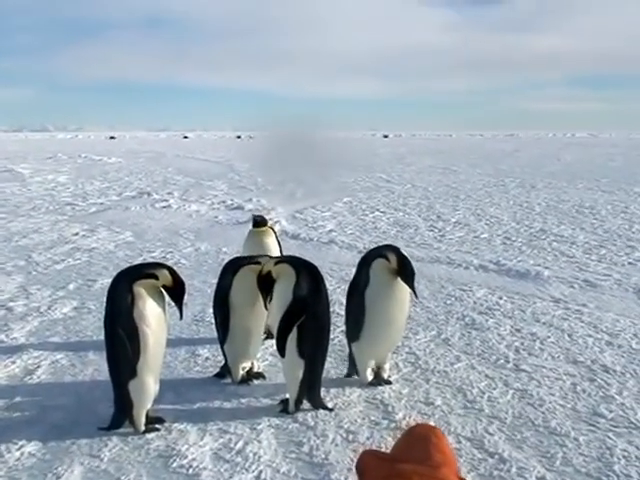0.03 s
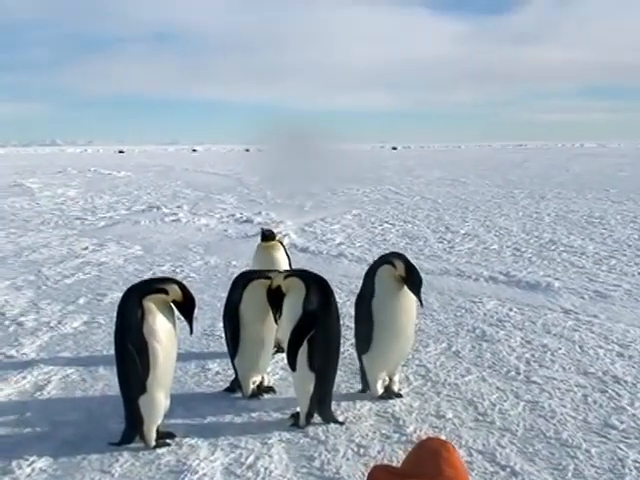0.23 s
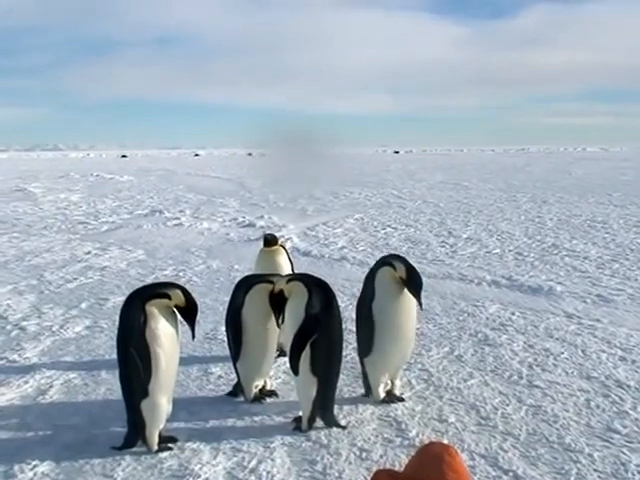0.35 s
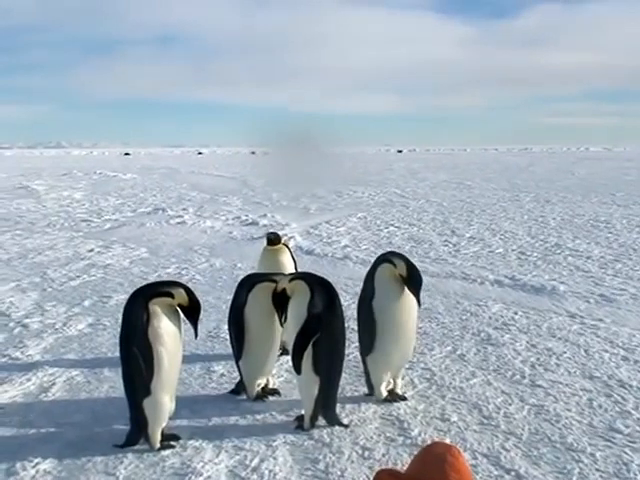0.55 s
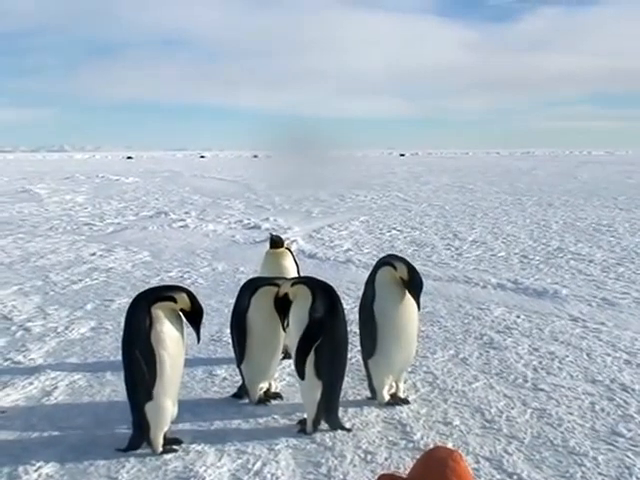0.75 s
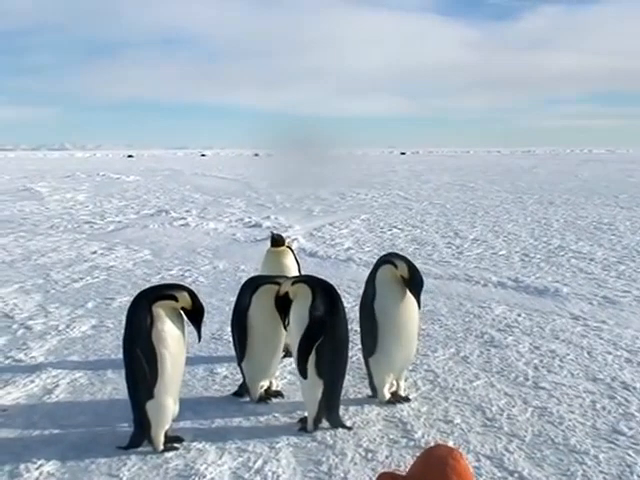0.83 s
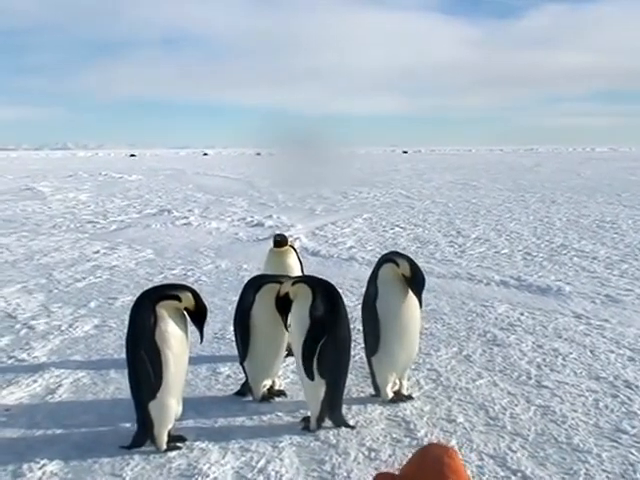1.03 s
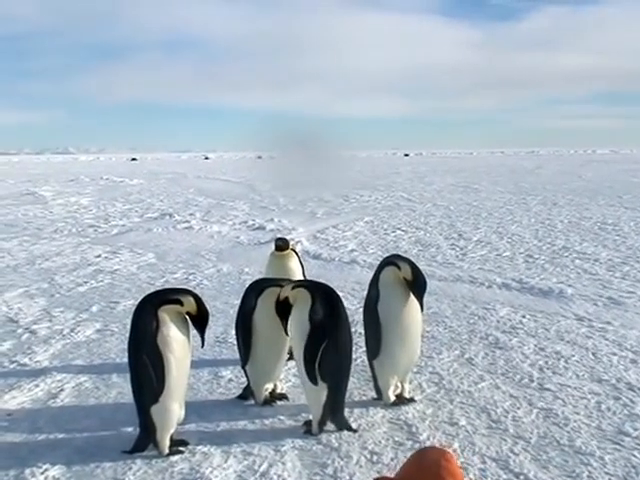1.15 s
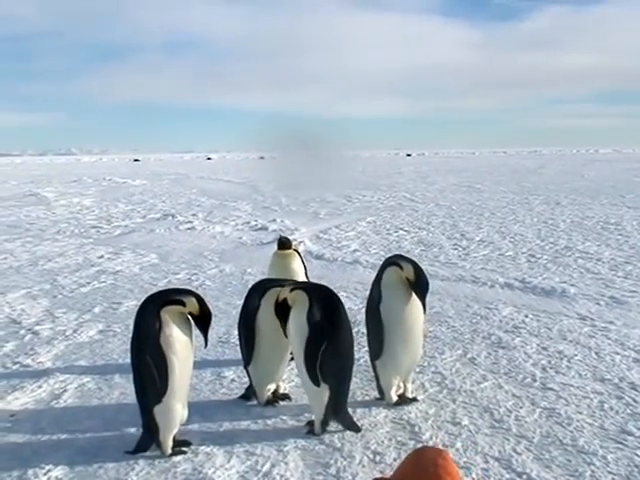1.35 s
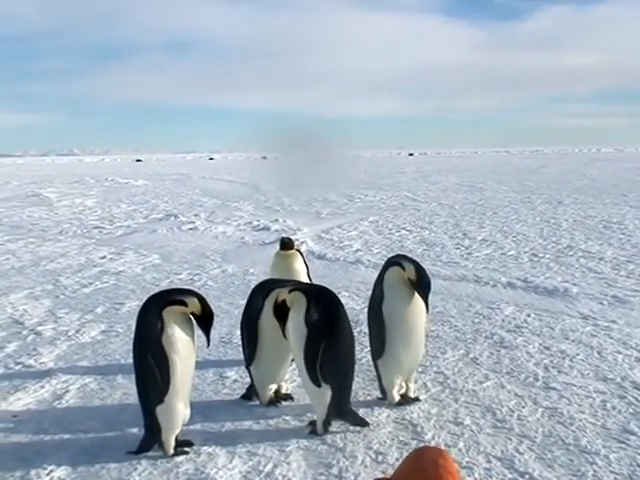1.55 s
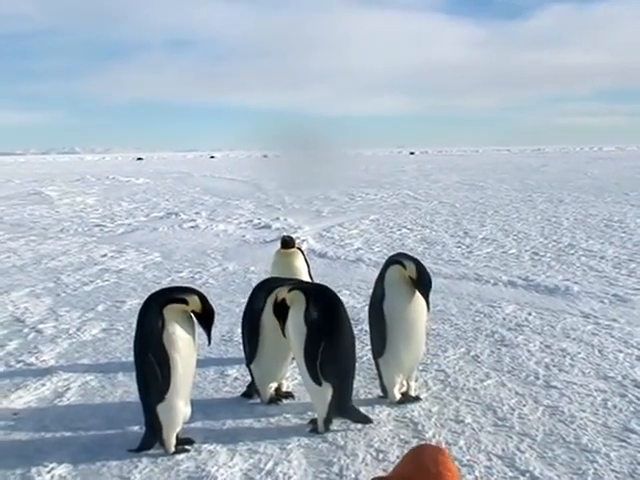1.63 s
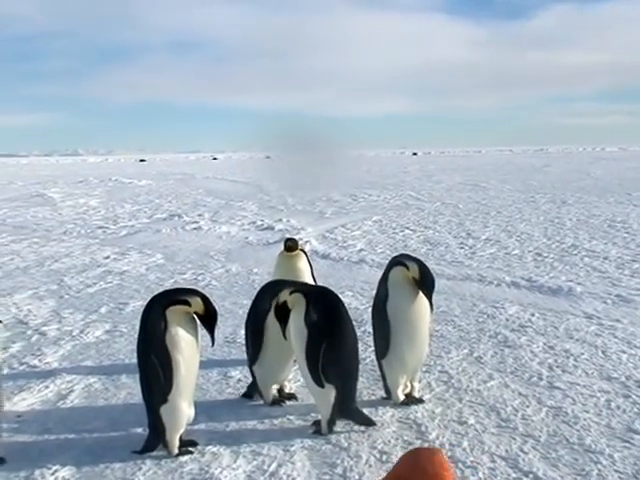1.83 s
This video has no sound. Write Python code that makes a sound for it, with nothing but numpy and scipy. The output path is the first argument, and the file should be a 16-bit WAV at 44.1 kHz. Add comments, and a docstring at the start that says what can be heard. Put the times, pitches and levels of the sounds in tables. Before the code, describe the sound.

A penguin's call dominates: dry uneven throat creaks at 0.12-0.23 s, then seven harsh, buzzing two-pitched syllables. Two short raspy bursts come by 0.4 s, three steadier ones until 1.0, a longer clearer one at 1.04-1.4, and a last at 1.44-1.63 that fades. Snow crunches and snaps at the start, softer steps follow, tiny snaps near 1.78. Faint open air and low hum throughout.

```python
"""Emperor penguin call on sea ice

A creak, then seven warbling syllables. Two syrinx sides pulse at different pitches and pull on each
other; the voice beats about 45-115 times a second as it rings the throat, and the ice scatters a tail.
Feet crunch and thud on snow (shaped grains and noise), crust snaps (single clicks) and a faint wash
of air with a low hum (filtered noise) runs throughout.
"""
import sys
import numpy as np
from scipy import signal
from scipy.fft import rfft, irfft
from scipy.io import wavfile
from scipy.ndimage import uniform_filter1d

SR = 44100
rng = np.random.default_rng(int(sys.argv[2]) if len(sys.argv) > 2 else 0)


def materialize(psi):
    """Save the field psi as 16-bit PCM at rate SR to the path in sys.argv[1].

    A 1-D psi becomes a single channel; in a 2-D psi each row is a channel.
    """
    bounded = np.clip(np.atleast_2d(psi).T, -1, 1)
    quanta = np.round(bounded * 32767).astype(np.int16)
    wavfile.write(sys.argv[1], SR, quanta)


N = 83790


def undb(db):
    """Decibels to gain."""
    return 10 ** (np.asarray(db) / 20)


def unit(x):
    """Scale to rms 1."""
    return x / np.sqrt(np.mean(x ** 2) + 1e-18)


def response(points, hz):
    """Interpolate (f/Hz, level/dB) points on a log-frequency axis."""
    f, db = np.array(points, float).T
    return np.interp(np.log(hz + 1), np.log(np.sort(f)), db)


# Throat spectrum added at harshness 1: f/Hz, level/dB
HARSH_SPECTRUM = [(300, 2.5), (450, 0), (660, 7.5), (820, -3.5), (1030, 2.5), (1250, 1), (1850, 8),
                  (2080, 15.5), (2400, 3.5), (2900, 6), (4000, -1.5), (5600, 7.5), (7500, 1.5),
                  (12000, 4.5)]


def ring(points, tuning=1, harshness=0, size=4096):
    """Minimum-phase impulse response of a body with this spectrum, by folding the cepstrum."""
    hz = np.arange(size // 2 + 1) * SR / size
    db = response(points, hz / tuning) + harshness * response(HARSH_SPECTRUM, hz)
    cepstrum = irfft(np.log(undb(db)))
    cepstrum[1:size // 2] *= 2
    cepstrum[size // 2 + 1:] = 0
    return irfft(np.exp(rfft(cepstrum)))[:size // 2]


def through(x, impulse):
    """Let x excite an impulse response."""
    return signal.fftconvolve(x, impulse)[:N]


def clicks(times_s, sizes, order=8):
    """Band-limited impulses at sub-sample times (windowed sinc)."""
    out = np.zeros(N)
    at = np.asarray(times_s)[:, None] * SR
    taps = np.floor(at).astype(int) + np.arange(1 - order, order + 1)
    kernel = np.sinc(taps - at) * np.sinc((taps - at) / order)
    np.add.at(out, np.clip(taps, 0, N - 1), np.asarray(sizes)[:, None] * kernel)
    return out


def noise(points):
    """Coloured noise of rms 1."""
    return unit(through(rng.standard_normal(N), ring(points)))


GRAINS_PER_S, GRAIN_SPREAD_DB = 2200, 1


def grains(points):
    """Dense small clicks of uneven size and random sign through a body, rms 1."""
    size_db = GRAIN_SPREAD_DB * np.minimum(rng.exponential(size=N), np.pi)
    size = undb(size_db) * rng.choice([-1, 1], N)
    present = rng.random(N) < GRAINS_PER_S / SR
    return unit(through(size * present, ring(points)))


def knocks(table, points):
    """Single clicks (t/s, level/dB) into one body of peak 1."""
    times_s, db = np.array(table).T
    body = ring(points)
    return through(clicks(times_s, undb(db)), body / abs(body).max())


# Air spectrum: f/Hz, level/dB
AIR_SPECTRUM = [(15, -6), (25, -22), (148, -7), (204, -2.5), (340, -10), (495, -6.5), (684, -14),
                (1200, -11), (3630, -16.5), (4870, -13.5), (9300, -23.5), (12200, -21.5), (15500, -43)]
AIR_DB, AIR_SIDE_DB = -45.5, -5  # side: relative to mid
HUM_HZ, HUM_WIDTH_HZ, HUM_DB = 99.7, 29, -57


def air(t):
    """Wide coloured noise plus a wavering hum of narrow-band noise."""
    hz = np.arange(N // 2 + 1) * SR / N
    resonance = 1 / (1 + ((hz - HUM_HZ) / HUM_WIDTH_HZ * 2) ** 2)
    hum = unit(irfft(rfft(rng.standard_normal(N)) * resonance, N))
    mid = noise(AIR_SPECTRUM)
    side = undb(AIR_SIDE_DB) * noise(AIR_SPECTRUM) * np.array([[1], [-1]])
    return undb(AIR_DB) * (mid + side) + undb(HUM_DB) * hum


# Foot presses: t/s, Gaussian half-width/s, crunch level/dB, thud level/dB
FOOT_STEPS = [(.005, 0.024, -33, -40), (0.032, 0.0042, -29, -31), (0.059, 0.021, -33.5, -45),
              (0.161, 0.051, -46.5, -31), (0.321, 0.037, -38.5, -38.5), (0.435, 0.055, -30, -36),
              (0.661, 0.037, -32, -42.5), (0.843, 0.024, -30, -43.5), (1.456, 0.038, -29.5, -45),
              (1.678, .025, -51, -53), (1.782, .011, -41.5, -46)]
# Crunch spectrum: f/Hz, level/dB
CRUNCH_SPECTRUM = [(100, -5), (400, 9.5), (750, 10.5), (1500, 1), (3300, -10), (5000, -21.5), (9000, -26.5),
                   (12000, -29.5), (15000, -22)]
# Thud spectrum: f/Hz, level/dB
THUD_SPECTRUM = [(45, -23), (110, 4), (200, 9), (330, 4), (600, 0), (1200, -6), (4000, -50)]
# Crust snaps: t/s, peak level/dB
CRUST_SNAPS = [(.005, -24), (.0097, -21.5), (.030, -34), (.0386, -23.5), (.0555, -24), (.0786, -26),
               (.0924, -25.5), (1.775, -32), (1.779, -28), (1.784, -33), (1.788, -31), (1.864, -36)]
# Snap spectrum: f/Hz, level/dB
SNAP_SPECTRUM = [(200, -10), (800, -30), (2000, 12), (3600, 4), (5000, -16), (9000, -12), (15000, -36)]


def snow(t):
    """Packing snow breaks grain by grain over a dull thud; bits of crust snap as single clicks."""
    crunch, thud = grains(CRUNCH_SPECTRUM), noise(THUD_SPECTRUM)
    steps = np.zeros(N)
    for at_s, length_s, crunch_db, thud_db in FOOT_STEPS:
        press = np.exp(-((t - at_s) / length_s) ** 2)
        steps += press * (undb(crunch_db) * crunch + undb(thud_db) * thud)
    return steps + knocks(CRUST_SNAPS, SNAP_SPECTRUM)


# Throat creak pulses before the voice catches: t/s, relative level/dB
CREAK_PULSES = [(.120, -9), (.123, -8), (.1295, -0.5), (.1365, -20), (.141, -1.5), (.1477, -7),
                (.1587, -14), (.167, -7), (.174, -14), (.186, -23), (.1873, -0.5), (.1915, -21),
                (.198, -10), (.2008, -6), (.210, -2), (.2245, 2.5), (.229, 1)]
# Creak spectrum: f/Hz, level/dB
CREAK_SPECTRUM = [(100, -14), (550, -7), (750, -1), (1080, -1), (1300, -9), (1550, -2), (1950, 0),
                  (2450, -8), (5000, -15), (7000, -28), (15000, -40)]
CREAK_DB, CREAK_GRIT_DB = -8.5, -34.5


def creak(t):
    """Slow, uneven throat pulses with fine grit between them lead into the call."""
    first_s, last_s = CREAK_PULSES[0][0], CREAK_PULSES[-1][0]
    span = uniform_filter1d(1. * ((t > first_s) & (t < last_s)), size=200)
    grit = undb(CREAK_GRIT_DB) * span * grains(CREAK_SPECTRUM)
    return grit - undb(CREAK_DB) * knocks(CREAK_PULSES, CREAK_SPECTRUM)


SQUEEZE, BEAT_LAG_CYCLES = .15, .02
JITTER_S, SHIMMER_DB = .00006, 2  # at roughness 1
RASP_DB, RASP_CYCLES = -13, .3


def membrane(t, phase, beat, rough):
    """One syrinx side: a pulse and a decaying puff each cycle; pulses swell with the beat."""
    times_s = np.interp(np.arange(1, phase[-1]), phase, t)
    late, size = rng.standard_normal((N // 20, 2))[:len(times_s)].T
    strength = 1 + SQUEEZE * np.cos(2 * np.pi * (beat + BEAT_LAG_CYCLES))
    pulse_rough = np.interp(times_s, t, rough)
    pulse_size = np.interp(times_s, t, strength) * undb(SHIMMER_DB * pulse_rough * size)
    pulses = clicks(times_s + JITTER_S * pulse_rough * late, pulse_size)
    puffs = unit(np.exp(-(phase % 1) / RASP_CYCLES) * rng.standard_normal(N))
    return unit(pulses) + undb(RASP_DB) * np.sqrt(rough) * puffs


TREBLE_HZ, TREBLE_DIP, DIP_LAG_CYCLES = 1315, 0.12, 0.019
WINDPIPE_S, WINDPIPE_ECHO = (.0009, .00155), 0.5


def windpipe(x, beat):
    """All-pass echoes thicken the treble, which softens as both sides close together; bass is direct."""
    hz = np.arange(N // 2 + 1) * SR / N
    treble = rfft(x) / (1 + (TREBLE_HZ / (hz + 1)) ** 20)
    bass = x - irfft(treble, N)
    for trip_s in WINDPIPE_S:
        delay = np.exp(-2j * np.pi * hz * trip_s)
        treble = treble * (WINDPIPE_ECHO + delay) / (1 + WINDPIPE_ECHO * delay)
    dip = 1 - TREBLE_DIP * np.cos(2 * np.pi * (beat + DIP_LAG_CYCLES))
    return bass + irfft(treble, N) * dip


# Syrinx pitch track: t/s, low side f/Hz, high side f/Hz
SYRINX_PITCH = [(.22, 250, 300), (.255, 335.9, 405.8), (0.284, 290.2, 337.4), (.307, 314.3, 374.4),
                (0.342, 375, 457), (.375, 324.6, 383.7), (0.403, 320.1, 366.7), (.43, 282.3, 331.6),
                (.455, 338.7, 404.3), (0.484, 385, 472.1), (.523, 336.2, 385.4), (0.567, 358.1, 429.6),
                (0.601, 344.5, 414), (.63, 287.3, 339.4), (.655, 348.2, 414.1), (.683, 389.2, 484.2),
                (.72, 344.2, 400.9), (0.767, 368, 435.1), (0.796, 359.5, 416.3), (.828, 279.4, 330.1),
                (.853, 345.4, 421.8), (.882, 395.2, 492.8), (.918, 346.4, 407.1), (0.965, 372.4, 444.3),
                (.99, 356.8, 420.8), (1.025, 282.6, 336.1), (1.046, 358.2, 444.8), (1.07, 402.1, 503),
                (1.107, 353.6, 411.7), (1.148, 374.6, 441), (1.182, 369.4, 431), (1.291, 373.7, 437.1),
                (1.384, 385.2, 453), (1.426, 305, 350), (1.446, 383.3, 483.6), (1.469, 411.9, 524.8),
                (1.498, 384.3, 448.1), (1.546, 390.4, 464.1), (1.579, 379, 438.4), (1.62, 361.2, 422.5),
                (1.659, 320.5, 371.6)]
# Syllables: start t/s, end t/s, level/dB, roughness/0-1, harshness/0-1, throat tuning/ratio
CALL_SYLLABLES = [(0.229, 0.266, -14, 0.77, 0.97, 1.026), (0.308, 0.408, -16, 0.71, 0.98, 1.022),
                  (0.453, 0.601, -15, 0.48, 0.78, 1.006), (.654, 0.805, -16.5, 0.31, 0.5, 0.99),
                  (0.852, 0.999, -16, 0.37, 0.3, 0.997), (1.042, 1.398, -15.5, 0.2, 0.03, 1.012),
                  (1.442, 1.632, -15.5, 0.22, 0.07, 1.023)]
# Throat and beak resonances: f/Hz, level/dB
THROAT_SPECTRUM = [(60, -48), (250, -33), (365, -23), (440, -12.5), (510, -13.5), (580, -21), (670, -8),
                   (745, 1), (880, 1.5), (985, -11), (1110, -5), (1280, -10), (1410, -16), (1540, -11),
                   (1880, -11), (2100, -24), (2330, -14), (2560, -11), (2800, -18), (3050, -15),
                   (3350, -19), (3620, -14), (4060, -16), (4400, -28), (4820, -18), (5150, -27),
                   (6200, -29), (7000, -35), (7550, -32), (8100, -40), (9600, -45), (12000, -38),
                   (15000, -48)]
PULL_LOW_CYCLES, PULL_HIGH_CYCLES, HIGH_SIDE_DB = .04, .045, .3
ATTACK_S, RELEASE_S, ONSET_ROUGH, ONSET_S = .011, .005, .22, .045
LINGER_DB, LINGER_S = -10, 0.017  # membranes flutter on after each syllable
FADE_FROM_S, FADE_DB_PER_S = 1.5364, -42  # bird runs out of air


def penguin(t):
    """Two coupled membranes ring the throat; each syllable starts rough and then clears."""
    at_s, *sides_hz = np.array(SYRINX_PITCH).T
    low, high = (np.cumsum(uniform_filter1d(np.interp(t, at_s, hz), size=600)) / SR for hz in sides_hz)
    beat = high - low  # cycles
    pull = np.sin(2 * np.pi * beat)

    rough = np.ones(N)
    for start_s, _, _, roughness, _, _ in CALL_SYLLABLES:
        onset = ONSET_ROUGH * np.exp(-((t - start_s) / ONSET_S) ** 2)
        rough = np.where(t > start_s - ATTACK_S, roughness + onset, rough)

    low_side = membrane(t, low + PULL_LOW_CYCLES * pull, beat, rough)
    high_side = membrane(t, high - PULL_HIGH_CYCLES * pull, beat, rough)
    source = low_side + undb(HIGH_SIDE_DB) * high_side
    fade = undb(FADE_DB_PER_S * np.maximum(t - FADE_FROM_S, 0))
    voice = unit(windpipe(source.mean() - source, beat) * fade)

    out = np.zeros(N)
    for start_s, end_s, db, _, harshness, tuning in CALL_SYLLABLES:
        after_s = np.maximum(t - end_s, 0)
        attack = np.clip((t - start_s) / ATTACK_S + .5, 0, 1)
        linger = undb(LINGER_DB) * np.exp(-after_s / LINGER_S)
        effort = attack * np.maximum(np.exp(-after_s / RELEASE_S), linger)
        throat = ring(THROAT_SPECTRUM, tuning, harshness)
        out += undb(db) * through(voice * effort, throat / np.linalg.norm(throat))
    return out


ICE_DB, ICE_S, ICE_SIDE_DB = -8.5, 0.011, -16.5  # side: relative to mid


def scatter(t):
    """Decaying noise impulse response of unit energy."""
    return unit(rng.standard_normal(N) * np.exp(-t / ICE_S)) / np.sqrt(N)


def ice(x, t):
    """Rough ice scatters a short, weak tail back to both sides."""
    mid, side = through(x, scatter(t)), through(x, scatter(t))
    return undb(ICE_DB) * (mid + undb(ICE_SIDE_DB) * side * np.array([[1], [-1]]))


# Bird balance, left minus right: f/Hz, level/dB
LEFT_MINUS_RIGHT = [(60, 0.0), (110, -0.5), (200, 4), (380, -0.5), (700, 0), (1290, -2), (2380, 0),
                    (4400, -3.5), (8120, -2), (15000, 1.5)]


def scene():
    """Bird almost straight ahead, with its ice tail, steps and air."""
    t = np.arange(N) / SR
    bird = penguin(t) + creak(t)
    channels = []
    for side in (1, -1):
        balance = [(hz, side * db / 2) for hz, db in LEFT_MINUS_RIGHT]
        channels.append(through(bird, ring(balance)))
    return np.array(channels) + ice(bird, t) + snow(t) + air(t)


TOP_HZ = 15200


def record(dry):
    """Soft saturation rounds the highest peaks; an elliptic low-pass cuts the top."""
    rounded = dry / (1 + (dry / .95) ** 4) ** .25
    low_pass = signal.ellip(8, .2, 80, TOP_HZ, fs=SR, output="sos")
    return signal.sosfilt(low_pass, rounded)


dry = scene()
out = record(dry)
materialize(out)
```